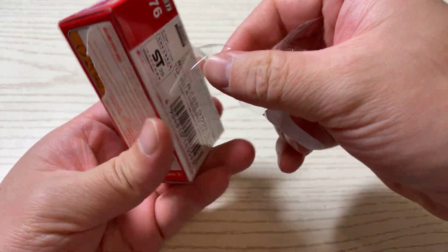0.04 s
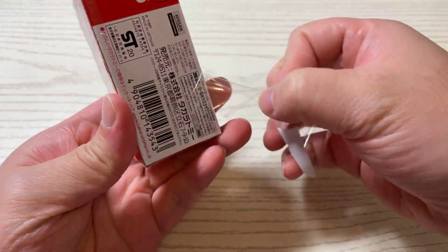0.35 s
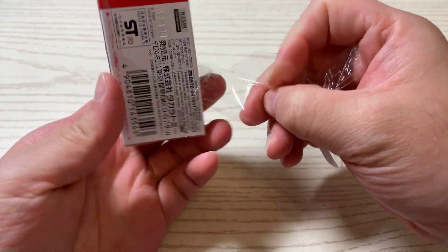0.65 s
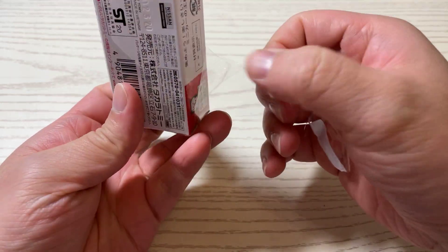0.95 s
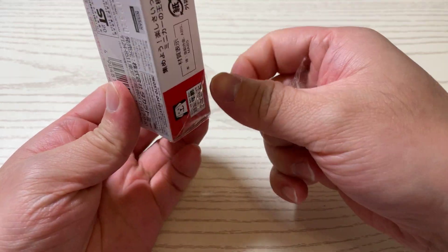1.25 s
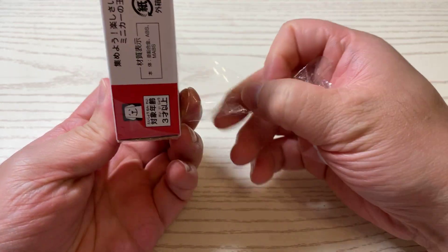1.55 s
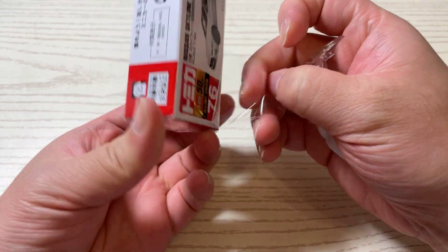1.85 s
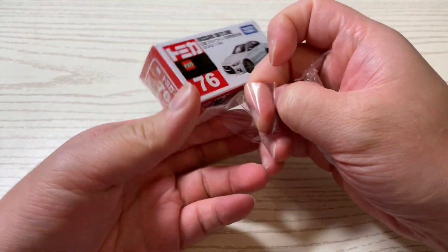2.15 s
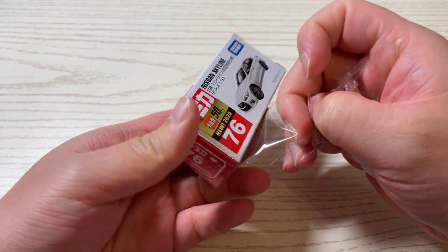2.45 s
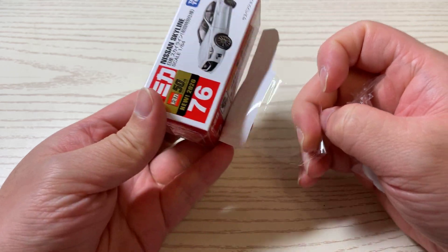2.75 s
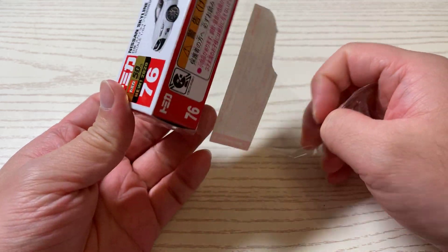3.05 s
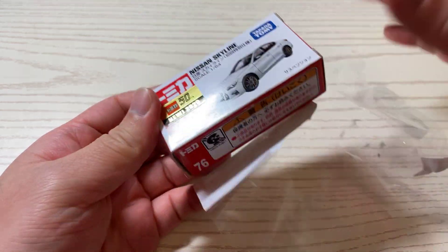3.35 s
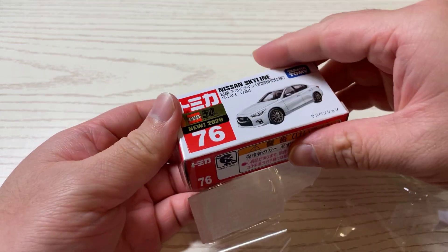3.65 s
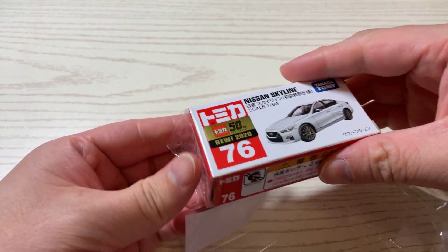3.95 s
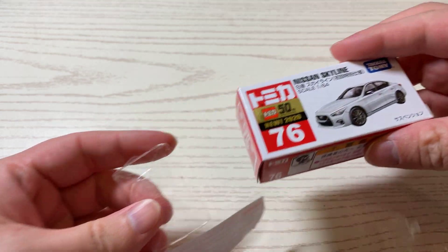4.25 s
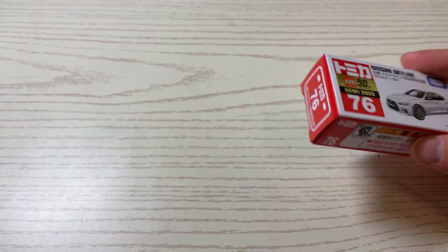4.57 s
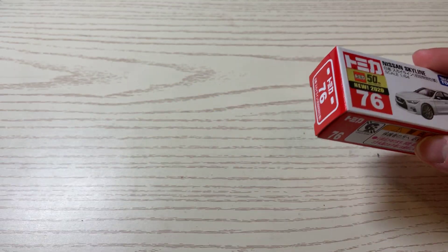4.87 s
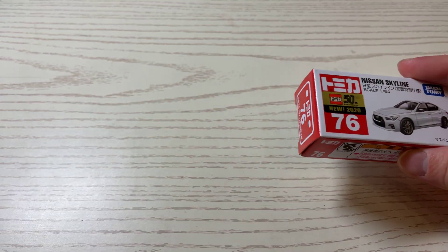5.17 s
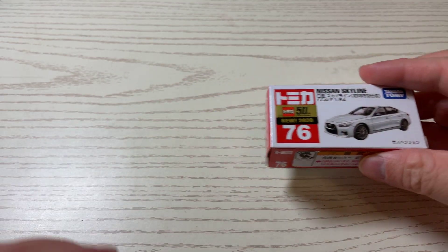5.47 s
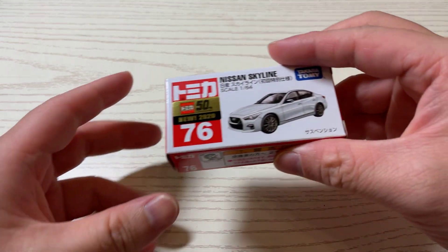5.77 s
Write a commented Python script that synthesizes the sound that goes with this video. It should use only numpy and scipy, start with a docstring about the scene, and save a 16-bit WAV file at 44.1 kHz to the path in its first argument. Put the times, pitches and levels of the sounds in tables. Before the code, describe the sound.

Fingers peel thin plastic wrap off a small cardboard box, with crinkles, sharp snaps, two quick rips and light knocks over a low hum.

```python
"""A small room, close up: fingers pick and peel the thin plastic wrap off a small cardboard box.
The film buckles in sharp snaps over a fine crinkle, rips open in two quick runs of slips and slides
off the card with a soft hiss. The box knocks and rubs in the hand. A pair of microphone ports hears
it all with a quick scatter off table and fingers and a short room tail, while a machine hums low."""
import sys
import numpy as np
from scipy import signal
from scipy.fft import rfft, irfft, next_fast_len
from scipy.io import wavfile
from scipy.ndimage import uniform_filter1d, map_coordinates

SR = 44100
rng = np.random.default_rng(int(sys.argv[2]) if len(sys.argv) > 2 else 0)


def put_to_file(sound):
    """Save the sound as 16-bit audio at rate SR, in the file named by the first command-line argument."""
    columns = np.atleast_2d(sound).T  # one column per channel
    safe = np.clip(columns, -1, 1)
    whole_steps = np.round(safe * 32767)
    wavfile.write(sys.argv[1], SR, whole_steps.astype(np.int16))


N = 260628

# Event levels are fader settings, ahead of each layer's trim and the ports' colour.
# The film's main buckles. Each row: start in seconds, crack in dB, flex in dB, crease pitch in Hz.
BUCKLES = [(0.0277, -29.5, -40, 5000), (0.0757, -25, -25.5, 3900), (0.1059, -28, -39, 3600),
           (0.1284, -25, -44, 6400), (0.1449, -31, -39, 5200), (0.1913, -37.5, -49, 6700),
           (0.2048, -39, -44, 4000), (0.279, -34.5, -35.5, 4400), (0.3706, -31, -28, 4700),
           (0.3738, -32, -27.5, 4840), (0.4083, -40, -40.0, 6600), (0.4293, -31, -35.0, 6800),
           (0.451, -20, -22.5, 4050), (0.4829, -26.5, -25.5, 3620), (0.509, -36.5, -38, 4200),
           (0.5503, -24, -28, 6800), (0.561, -24.5, -40.5, 5600), (0.5795, -34, -35, 3040),
           (0.5952, -26.5, -25, 6850), (0.5989, -20.5, -23.5, 6800), (0.6746, -22.0, -33, 6800),
           (0.6897, -23.5, -28, 2780), (0.7287, -35.0, -40, 3800), (0.7559, -51, -26, 2810),
           (0.772, -26, -33, 6800), (0.7838, -58, -38, 1600), (0.8346, -26, -33, 2800),
           (0.9003, -24.5, -30.5, 6800), (0.9312, -23, -32, 3200), (0.9355, -22, -25, 3130),
           (0.9824, -33, -35.0, 2800), (1.0244, -27.5, -31.5, 2620), (1.0844, -23.5, -35, 6500),
           (1.0977, -29.5, -29.5, 5470), (1.1077, -26, -26.5, 5870), (1.1243, -30, -43, 3000),
           (1.1335, -31, -37, 6700), (1.1703, -46, -27.5, 3030), (1.1972, -22.5, -28.5, 5200),
           (1.2271, -29.0, -27, 2980), (1.2439, -35, -36, 2800), (1.2823, -32, -40.5, 5100),
           (1.3428, -28, -29, 3980), (1.3808, -35, -34, 4600), (1.4463, -45, -29.5, 4530),
           (1.4719, -24, -33, 6600), (1.4814, -26, -30, 3880), (1.5069, -33, -46, 4600),
           (1.5542, -23.5, -27.5, 4600), (1.6129, -29, -31, 2940), (1.6352, -35, -28, 2200),
           (1.7003, -26.5, -27, 3550), (1.7595, -25.5, -35, 6000), (1.8282, -39, -39.5, 5030),
           (1.8611, -32.5, -39.0, 3000), (1.8905, -39, -44, 5000), (1.9799, -38, -56, 3600),
           (2.0076, -36.5, -42, 3000), (2.0385, -35.5, -36, 2800), (2.0506, -21.5, -47, 5950),
           (2.0783, -38, -57.5, 6000), (2.0931, -39.0, -37, 1794), (2.1246, -43, -62.5, 2400),
           (2.1569, -41, -47.5, 3100), (2.1866, -41, -43, 3670), (2.2115, -38.5, -49, 3700),
           (2.3004, -36.5, -47, 1600), (2.37, -40, -43, 5100), (2.3859, -38, -43.5, 5200),
           (2.429, -30.5, -44, 5200), (2.4773, -31.5, -30.5, 3100), (2.5857, -31, -27.5, 2760),
           (2.6201, -36, -55, 5100), (2.6337, -32, -40.5, 6700), (2.6612, -16, -31, 2680),
           (2.6827, -15.5, -21.5, 6000), (2.7137, -17, -26.5, 1600), (2.7362, -16.0, -20, 1700),
           (2.9084, -29, -43, 3600), (2.9564, -35.5, -33, 5140), (2.995, -29.0, -35.5, 5100),
           (3.0185, -19.5, -36, 6470), (3.097, -24.5, -27.5, 6570), (3.1258, -25, -25.0, 1700),
           (3.152, -27.5, -37.0, 6500), (3.2037, -31.5, -33.0, 2790), (3.2378, -44, -58, 1600),
           (3.2505, -47, -43, 1920), (3.4299, -44, -48.5, 3500), (3.4519, -46, -37, 3500),
           (3.7425, -30, -36.5, 3840), (3.7798, -53.5, -44.5, 2400), (3.8978, -44, -42.5, 2520),
           (3.9797, -37, -30.5, 6170), (3.9834, -26, -48, 6730), (3.9951, -31.5, -24, 1870),
           (4.0611, -46, -34, 4400), (4.0659, -33, -29.5, 3180), (4.0811, -57, -36, 2500),
           (4.0915, -42.0, -32.5, 2940), (4.1239, -19, -32, 6900), (4.1273, -20.5, -22.5, 1760),
           (4.2897, -21.5, -30.5, 6800), (4.3183, -36.5, -41, 5400), (4.3367, -41, -43, 2600),
           (4.3617, -25, -38.5, 4900), (4.3829, -19, -35.5, 6800), (4.4184, -27, -42.5, 6800),
           (4.4288, -26.0, -37.5, 6800), (4.4416, -30, -50.0, 6400), (4.4975, -32.5, -43, 6300),
           (4.5052, -25.5, -37.5, 6400), (4.5909, -42.5, -46.5, 2040), (4.7373, -34, -44, 6520),
           (4.7564, -39.0, -44, 6300), (4.7639, -36, -38, 6400), (4.85, -35.5, -36.5, 4860),
           (4.8647, -39.5, -38.5, 5140), (4.8993, -38.5, -36.5, 1630), (5.0434, -39.5, -46, 3480),
           (5.6645, -48.5, -47.5, 2570)]
# Taut film cracks brighter than slack. Each row: time in seconds, treble tilt in dB per octave.
FILM_TENSION = [(0, -12), (1.2, -1.5), (1.8, -4), (3.1, 0.5), (4.1, -7.5), (5.2, -12)]
# The taut film rips open. Each row: start in seconds, length in seconds, slips per second, crack in dB,
# pluck in dB, sizzle in dB, wall pitch in Hz, moment of hardest pull as a share of the length,
# flap in dB, flap sag in Hz per second.
RIPS = [(2.6614, .104, 105, -20.5, -26.5, -33.5, 1563, 0.63, -55.5, 642),
        (2.8401, 0.081, 150, -25.5, -29, -28.5, 1150, 0.26, -38, 1620)]
# How hard the fingers work the film. Each row: time in seconds, level in dB.
FINGER_EFFORT = [(0, -50.5), (.23, -57.5), (.32, -49), (1.25, -52.5), (1.65, -48.5), (1.8, -59.5),
                 (2.05, -53), (2.2, -61.5), (2.54, -60.5), (2.78, -50.5), (3.3, -55.5), (3.39, -82),
                 (3.84, -69), (4.02, -52.5), (4.5, -59.5), (4.72, -76), (5.1, -72.5), (5.9, -89.5)]
# A finger pulls or shifts the film.
# Each row: start in seconds, length in seconds, rustle in dB, fine crinkle in dB.
CRUMPLES = [(.005, 0.014, -49, -31.5), (0.078, 0.026, -49, -37), (0.27, 0.046, -50, -48),
            (0.537, 0.061, -42.5, -44), (0.67, 0.095, -49.5, -46), (0.915, 0.16, -53, -48),
            (1.071, .06, -47.5, -46), (1.189, 0.044, -45, -39), (1.388, 0.089, -45, -46),
            (1.518, 0.11, -42.5, -44), (1.865, 0.029, -51, -47), (2.018, 0.088, -53, -46),
            (3.106, 0.035, -35.5, -33), (3.185, 0.025, -41.5, -41), (3.93, 0.084, -48, -49),
            (3.995, 0.12, -47, -49), (4.288, 0.213, -55.5, -52), (4.566, 0.11, -65, -65),
            (4.754, 0.065, -53, -56.5), (4.845, 0.022, -49, -46), (4.877, 0.25, -55, -62),
            (5.204, 0.022, -58, -56.5), (5.42, 0.033, -67.5, -69), (5.666, 0.052, -67, -66)]
# Tugs and taps on a wall of the box. Each row: time in seconds, level in dB, centre pitch in Hz.
BOX_KNOCKS = [(.0135, -34.5, 1150), (.0775, -40, 990), (.3238, -34, 375), (.4303, -27.5, 750),
              (.452, -28.5, 1230), (.6007, -31.5, 1180), (.604, -35.5, 290), (.6316, -30, 1100),
              (.6506, -33, 970), (.6918, -21.5, 1820), (.7565, -43, 1300), (.785, -34, 1400),
              (.9014, -31.5, 1190), (1.4472, -31, 1010), (1.5423, -24.5, 902), (1.618, -34, 1590),
              (1.637, -29, 1260), (1.7035, -30, 1000), (1.7183, -28.5, 763), (2.052, -27.5, 1260),
              (2.2635, -47, 1250), (2.4784, -33, 1300), (2.5867, -28, 1345), (2.6955, -24.5, 1600),
              (2.7065, -25, 1450), (2.7155, -20.5, 1400), (2.7372, -23.5, 1100), (2.7412, -24.5, 1000),
              (3.022, -32.5, 803), (3.1274, -24, 1385), (3.2069, -29, 910), (3.6322, -38, 980),
              (3.997, -23, 700), (4.0005, -28, 270), (4.0715, -43, 420), (4.0925, -28, 1700),
              (4.1336, -30, 605), (4.291, -37, 607), (4.9003, -35.5, 797), (5.0277, -36.5, 920)]
# Skin drags over card. Each row: start in seconds, length in seconds, level in dB, hollow pitch in Hz.
SKIN_RUBS = [(0.261, 0.033, -48, 1204), (0.294, 0.059, -46.5, 470), (0.407, 0.048, -53.5, 648),
             (0.589, 0.074, -54, 1350), (0.738, .05, -49.5, 1195), (0.958, 0.092, -53.5, 1400),
             (1.085, 0.029, -49.5, 1006), (1.462, 0.025, -42, 1050), (1.495, 0.04, -48.5, 481.6),
             (1.567, 0.061, -44.5, 1311), (1.715, 0.017, -43, 827), (2.04, 0.042, -49, 1395),
             (2.238, 0.048, -48, 1450), (3.11, 0.038, -42.5, 270), (3.986, 0.018, -44, 455),
             (4.066, 0.012, -40.5, 906), (4.133, 0.01, -43, 248), (4.75, 0.018, -49.5, 1250)]
# Smooth film slides off the card. Each row: start in seconds, length in seconds, level in dB.
FILM_SLIDES = [(1.863, 0.32, -63), (3.427, .1, -54), (3.527, 0.16, -59), (3.69, 0.078, -54.5),
               (3.902, 0.068, -58), (4.902, .2, -65)]

# EQ curves. Each row: frequency in Hz, relative level in dB.
CRACK_EQ = [(3000, -48.5), (6000, -7), (8000, -3), (10500, 2), (12200, -0.5), (14000, 1.5), (15500, -6),
            (16500, -42.5)]  # the bright edge of a buckle
FLEX_EQ = [(400, -22.5), (1000, -5), (1500, -4.5), (2300, 1.5), (3000, 1.5), (5000, -0.5), (6500, 0.5),
           (9000, -14.5)]  # the body of the bending sheet
PANEL_EQ = [(750, -32.5), (1050, 5), (1450, 2), (2100, 8), (2800, -4.5), (5000, 2.5), (7000, -15.5),
            (9000, -24)]  # a taut panel of film, plucked
CARD_EQ = [(90, -43), (180, 1), (280, 2), (500, -3.5), (700, -1), (960, 3.5), (1300, -1.5), (2200, -9),
           (5000, -29.5)]  # dull cardboard
SLIDE_EQ = [(700, -8), (2000, -5), (3600, 0.5), (5000, -3), (7500, 2), (14000, -8.5), (16500, -25)]  # the hiss of gliding film
PORT_EQ = [(450, 1.5), (650, -1.5), (950, 0), (5200, 1), (5600, -3.5), (6400, -0.5), (8200, 0), (9800, 0),
           (12700, -0.45), (14000, 1)]  # the colour of the microphone ports
ROOM_TONE_EQ = [(18, -27.5), (28, -18.5), (42, -5), (60, -4), (78, -6.5), (100, -5.5), (125, -4),
                (165, -20.5), (300, -22), (600, -30.5), (1500, -37.5), (4000, -57), (9000, -70.5),
                (15000, -52.5)]  # rumble and faint hiss

# Stereo width. Each row: frequency in Hz, left-right likeness from 0 to 1.
FACET_LIKENESS = [(200, .85), (1000, .75), (2500, .58), (5000, .55), (8000, .8), (14000, .92)]  # the crumpled sheet radiates from many facets
DIFFUSE_LIKENESS = [(100, .97), (300, .75), (1000, .4), (4000, .2), (8000, .5), (14000, .75)]  # sound from all around
# The hands reach the ports at different moments. Each row: frequency in Hz, left lead in radians.
PORT_LEAD = [(200, 0), (1300, .6), (2800, 1.5), (4000, .6), (5200, .5), (5800, -1.2), (7000, -1.8),
             (7700, -2.8), (9500, -3.6), (12500, -5.8), (14000, -6.1)]
# They also arrive at different levels. Each row: frequency in Hz, left minus right in dB.
PORT_BALANCE = [(120, -12), (450, 6.5), (2000, 2), (3200, 5), (5300, 4), (5700, -5.5), (6900, 6.5),
                (9000, -1)]
# Base decay of the reflections, scaled for each tail. Each row: frequency in Hz, T60 in seconds.
BASE_DECAY = [(200, 0.08), (1500, 0.31), (6000, 0.16), (15000, 0.09)]
# The machine's hum. Each row: centre in Hz, width in Hz, rms level in dB.
HUM_BANDS = [(57.8, 10.9, -50), (118.3, 8.7, -61), (144.5, 2.2, -58), (289.2, 15, -72)]

ATTACK_S, FILM_RELEASE_T60_S, RUB_RELEASE_T60_S = 0.0072, 0.12, .05  # envelopes of finger movements
RIP_RELEASE_T60_S = 0.088


def film_snaps(crack_trim_db=-1, flex_trim_db=-2):
    """Each buckle is a bright crack and a slower flex of the sheet, ringing at its crease's pitch."""
    start, crack_db, flex_db, crease_hz = np.vstack([in_steps(np.array(BUCKLES)), chance_buckles()]).T
    tilt_db = np.interp(start, *np.transpose(FILM_TENSION))[:, None]
    crack = bursts(start, crack_db + crack_trim_db, CRACK_EQ, rise=0.0002, t60=0.0051,
                   ring_db=-24, ring_t60=0.059, ripple_db=3.5, tilt_db=tilt_db)
    flex = bursts(start, flex_db + flex_trim_db, FLEX_EQ, rise=0.00037, t60=0.006,
                  ring_db=-20.5, ring_t60=0.066, ripple_db=3, crease_hz=crease_hz)
    return crack + flex


def in_steps(buckles, lead_in_s=.0013, lead_in_db=-19.5, settle_s=.0031, settle_db=-11.5):
    """A buckle gives way in steps: a weak slip leads into it and another settles it."""
    early, late = (.5 + rng.random((len(buckles), 2))).T
    step = lambda delay, db: buckles + np.outer(delay, [1, 0, 0, 0]) + [0, db, db, 0]
    return np.vstack([buckles, step(-lead_in_s * early, lead_in_db), step(settle_s * late, settle_db)])


def chance_buckles(count=160, per_s=18, crack_db=12, flex_db=9, scatter_db=3, pitch_hz=3400):
    """Small random ticks whose level rides on the fingers' effort, in rows like BUCKLES."""
    chance = rng.random((count, 4))
    start = np.cumsum(-np.log(1 - chance[:, 0])) / per_s
    effort_db = np.interp(start, *np.transpose(FINGER_EFFORT))[:, None]
    db = effort_db + scatter_db * np.sqrt(3) * (2 * chance[:, 1:3] - 1)
    crease_hz = pitch_hz * 2 ** (2 * chance[:, 3] - 1)
    return np.column_stack([start, db + [crack_db, flex_db], crease_hz])[start < N / SR]


def tear(wall_db=-2.5):
    """Each slip of a rip cracks, plucks the taut panel and tugs the box, over flap and sizzle."""
    start, crack_db, pluck_db, wall_hz = rip_slips().T
    crack = bursts(start, crack_db, CRACK_EQ, rise=.00025, t60=.0045,
                   ring_db=-18, ring_t60=.035, ripple_db=3)
    pluck = bursts(start, pluck_db, PANEL_EQ, rise=0.00024, t60=0.0064,
                   ring_db=-11.5, ring_t60=0.062, ripple_db=0.0)
    tugs = box_knocks(np.column_stack([start, pluck_db + wall_db, wall_hz]), ring_db=-2, ring_t60=0.025)
    return crack + pluck + tugs + flap() + sizzle()


def rip_slips(count=24, jitter=.2, scatter_db=1, swell_db=26, wall_sag_hz_per_s=4000):
    """A rip advances in nearly even jumps; the plucks swell toward the hardest pull, then ease off."""
    rows = []
    for start, length, rate, crack_db, pluck_db, _, wall_hz, hardest, *_ in RIPS:
        late, size = rng.standard_normal((count, 2)).T
        step = np.arange(count)
        age = (step + jitter * late * (step > 0)) / rate
        size_db = scatter_db * np.clip(size, -1, 1)
        pull_db = -swell_db * (age / length - hardest) ** 2
        pitch_hz = wall_hz - wall_sag_hz_per_s * age  # the loosening wall sounds lower
        slips = np.column_stack([start + age, crack_db + size_db, pluck_db + size_db + pull_db, pitch_hz])
        rows.append(slips[age < length])
    return np.vstack(rows)


def sizzle(rustle_db=-7.5, rub_db=-8.5):
    """Between its slips a rip parts the film in a dense stream that shakes sheet and card."""
    start, length, _, _, _, sizzle_db, *_ = np.transpose(RIPS)
    parting = grains(CRACK_EQ, per_s=3000, scatter_db=3.0, clump_db=6.0)
    sheet = amp(rustle_db) * grains(FLEX_EQ, per_s=2000, scatter_db=3.0, clump_db=3.5)
    card = amp(rub_db) * grains(CARD_EQ, per_s=4500, scatter_db=3.5, clump_db=3.0)
    gain = strokes(start, length, sizzle_db, attack=0.0019, release_t60=RIP_RELEASE_T60_S)
    return gain * (parting + sheet + card)


def flap(start_hz=352.5, hold_share=.75):
    """The freed flap drums, ever lower as the rip lengthens it."""
    age, _, rip_length, *_, sag = latest(RIPS)
    start, length, *_, db, _ = np.transpose(RIPS)
    gain = strokes(start, hold_share * length, db, attack=0.037, release_t60=RIP_RELEASE_T60_S)
    return gain * rough_tone(start_hz - sag * np.minimum(age, rip_length), width_hz=60)


def handling(steady_crinkle_db=1.5, steady_rub_db=-6, still_hand_db=-66):
    """Fingers crinkle film and drag over card: a bed that follows their effort, plus each movement."""
    effort_db = np.interp(np.arange(N) / SR, *np.transpose(FINGER_EFFORT))
    start, length, rustle_db, crinkle_db = np.transpose(CRUMPLES)
    crinkle = power_sum(amp(effort_db + steady_crinkle_db), strokes(start, length, crinkle_db))
    rustle = power_sum(amp(effort_db), strokes(start, length, rustle_db))
    rub = power_sum(amp(still_hand_db), amp(effort_db + steady_rub_db), rub_envelope())
    return (crinkle * amp(-2.0) * grains(CRACK_EQ, per_s=4800, scatter_db=5.5, clump_db=6.0)
            + rustle * amp(-2.5) * grains(FLEX_EQ, per_s=2500, scatter_db=5.5, clump_db=3.5)
            + rub * amp(-1.5) * grains(CARD_EQ, per_s=1500, scatter_db=3.5, clump_db=6.0))


def box_knocks(knocks, ring_db=-9, ring_t60=0.019, wave_db=-1, thud_db=-18, octaves=0.46, size=2048):
    """A tap sends a bending wave through the card, highs first; the wall rings over a dull thud."""
    start, db, pitch_hz = np.transpose(knocks)
    centre = pitch_hz[:, None]
    t, hz = np.arange(size) / SR, np.fft.rfftfreq(size, 1 / SR) + 1
    lead_s, travel_s = .004, 0.002667  # pre-roll for the early highs; travel time at 1 kHz
    delay = lead_s + travel_s * (np.sqrt(1000 / hz) - np.sqrt(1000 / centre))
    phase = 2 * np.pi * np.cumsum(delay, axis=1) * SR / size
    stiffness = np.clip(centre / 1300, .55, 1.1)  # slack walls give a broad tap, taut ones ring
    wave = irfft(np.exp(-.5 * (np.log2(hz / centre) * stiffness / octaves) ** 2 - 1j * phase))
    wave = wave / np.abs(wave).max(axis=1, keepdims=True)
    ring = stiffness ** 2 * np.sin(2 * np.pi * centre * t) * fade(t, ring_t60)
    thud = bursts(start, db + thud_db, CARD_EQ, rise=.0005, t60=.02,
                  ring_db=-14, ring_t60=.035, ripple_db=3)
    return (placed(start - lead_s, amp(db + wave_db)[:, None] * wave)
            + placed(start, amp(db + ring_db)[:, None] * ring) + thud)


def hollow_card(trim_db=-6.5, sag_octaves_per_s=8):
    """The card under a sliding finger rings with a sinking, hollow tone."""
    age, _, length, _, pitch_hz = latest(SKIN_RUBS)
    sunk_octaves = sag_octaves_per_s * np.minimum(age, length)
    return amp(trim_db) * rub_envelope() * rough_tone(pitch_hz * 2 ** -sunk_octaves, width_hz=240)


def rub_envelope():
    """The card sounds while skin drags over it and stops soon after it lets go."""
    start, length, db, _ = np.transpose(SKIN_RUBS)
    return strokes(start, length, db, release_t60=RUB_RELEASE_T60_S)


def sliding_wrap():
    """The loosened wrap glides over the box with a soft hiss, without buckling."""
    hiss = grains(SLIDE_EQ, per_s=6600, scatter_db=3.0, clump_db=3.5)
    return strokes(*np.transpose(FILM_SLIDES)) * hiss


def bursts(times, db, eq, rise, t60, ring_db, ring_t60, ripple_db, tilt_db=0, crease_hz=None, size=2048):
    """Short stereo noise hits with a weaker ring; a random ripple gives each its own resonances."""
    t, hz = np.arange(size) / SR, np.fft.rfftfreq(size, 1 / SR)
    chance = rng.standard_normal((len(times), 3, size)).swapaxes(0, 1)
    treble_octaves = np.log2(np.maximum(hz, 7000) / 7000)
    ripple = unit(uniform_filter1d(chance[2, :, :len(hz)], size=24, axis=1))
    colour_db = along(eq, hz) + ripple_db * ripple + tilt_db * treble_octaves
    if crease_hz is not None:
        boost_db, width_octaves = 8, .14  # a narrow bell at the crease's pitch
        octaves_off = np.log2((hz + 1) / crease_hz[:, None])
        colour_db = colour_db + boost_db * np.exp(-.5 * (octaves_off / width_octaves) ** 2)
    noise = irfft(rfft(chance[:2]) * amp(colour_db))
    attack = 1 - np.exp(-(t / rise) ** 2)
    decay = fade(t, t60) + amp(ring_db) * fade(t, ring_t60)
    hits = noise * attack * decay
    onset_rms = np.sqrt(np.mean(hits[..., t < .002] ** 2, axis=-1))  # the first 2 ms set the level
    hits = hits * (amp(db) / onset_rms)[..., None]
    return spread(np.array([placed(times, half) for half in hits]), FACET_LIKENESS)


def grains(eq, per_s, scatter_db, clump_db):
    """A texture of countless tiny slips, unequal in size, that come in clumps."""
    slips = (rng.random(N) < per_s / SR) * rng.choice([-1, 1], (2, N))
    size_db = scatter_db * np.clip(rng.standard_normal(N), -2, 2)
    swell_db = clump_db * np.clip(wobble(130), -2, 2)
    return coloured(spread(slips * amp(size_db + swell_db), FACET_LIKENESS), eq)


def rough_tone(hz, width_hz):
    """A resonance shaken at random, following a pitch curve, at rms 1."""
    phase = 2 * np.pi * np.cumsum(hz) / SR
    return unit(np.sin(phase + wobble(width_hz)) * amp(3.8 * wobble(width_hz)))


def strokes(starts, lengths, db, attack=ATTACK_S, release_t60=FILM_RELEASE_T60_S):
    """The joint envelope of movements that each rise, hold and die away."""
    t = np.arange(N) / SR
    power = np.zeros(N)
    for start, hold, level in zip(starts, lengths, db):
        near = slice(max(int(start * SR), 0), int((start + hold + release_t60) * SR))
        age = t[near] - start
        release = fade(np.maximum(age - hold, 0), release_t60)
        power[near] += (amp(level) * np.clip(age / attack, 0, 1) * release) ** 2
    return np.sqrt(power)


def latest(rows):
    """For every sample: the age of the latest event, then each of its columns."""
    table, t = np.array(rows), np.arange(N) / SR
    now = table[np.maximum(np.searchsorted(table[:, 0], t) - 1, 0)]
    return np.maximum(t - now[:, 0], 0), *now.T


def placed(times, sounds):
    """Lay one row of sound per event on the timeline."""
    index = np.round(times * SR).astype(int)[:, None] + np.arange(sounds.shape[1])
    return np.bincount(np.maximum(index, 0).ravel(), sounds.ravel(), N)[:N]


def power_sum(*gains):
    """Unrelated movements add in power."""
    return np.sqrt(sum(gain ** 2 for gain in gains))


def amp(db):
    """Decibels to gain."""
    return 10 ** (np.asarray(db) / 20)


def unit(x):
    """Scale to rms 1."""
    return x / np.sqrt(np.mean(x ** 2) + 1e-20)


def along(points, hz):
    """Read a curve of (Hz, value) points on a log frequency axis."""
    point_hz, values = np.transpose(points)
    return np.interp(np.log(hz + 1), np.log(point_hz + 1), values)


def fade(t, t60):
    """Exponential decay, 60 dB down after t60 seconds."""
    return np.exp(-np.log(1000) * t / t60)


def wobble(rate):
    """A smooth random curve, rate knots a second."""
    knots = rng.standard_normal(4096)
    return map_coordinates(knots, [np.arange(N) * rate / SR], mode="wrap")


def filtered(x, response):
    """Run x through a complex frequency response."""
    size = next_fast_len(N + SR // 2)
    return irfft(rfft(x, size) * response(np.fft.rfftfreq(size, 1 / SR)), size)[..., :N]


def coloured(x, eq):
    """x through an EQ curve, at rms 1."""
    return unit(filtered(x, lambda hz: amp(along(eq, hz))))


def spread(pair, likeness):
    """Mix two unrelated signals as mid and side into left and right of a given likeness."""
    size = pair.shape[-1]
    fast = next_fast_len(size, True)
    turn = np.arccos(np.clip(along(likeness, np.fft.rfftfreq(fast, 1 / SR)), -1, 1)) / 2
    mid, side = rfft(pair[0], fast) * np.cos(turn), rfft(pair[1], fast) * np.sin(turn)
    return irfft(np.array([mid + side, mid - side]), fast)[..., :size]


def diffuse(size):
    """Stereo noise that arrives from all around."""
    return spread(rng.standard_normal((2, size)), DIFFUSE_LIKENESS)


def ports(pair):
    """The two ports colour the hands' sound and hear it with a different phase and level."""
    left = lambda hz: np.exp(.5j * along(PORT_LEAD, hz)) * amp(along(PORT_BALANCE, hz) / 2)
    return filtered(pair, lambda hz: amp(along(PORT_EQ, hz)) * np.array([left(hz), 1 / left(hz)]))


def reflections(x, t60_scale, build_s, size=SR // 2):
    """A diffuse stereo tail in which each frequency dies at its own speed."""
    hz, t, bands = signal.stft(diffuse(size), SR, nperseg=256)
    decay = fade(t, t60_scale * along(BASE_DECAY, hz)[:, None])
    tail = signal.istft(bands * decay, SR, nperseg=256)[1]
    tail = tail * (1 - np.exp(-(np.arange(tail.shape[1]) / SR / build_s) ** 2))
    return signal.fftconvolve(x.mean(axis=0)[None], tail / np.linalg.norm(tail[0]), axes=1)[:, :N]


def machine_hum():
    """A machine's low, wavering hum, made of narrow bands of noise."""
    hum = np.zeros(N)
    for centre_hz, width_hz, db in HUM_BANDS:
        band = lambda hz: 1 / (1 + (2 * (hz - centre_hz) / width_hz) ** 4)
        hum += amp(db) * unit(filtered(rng.standard_normal(N), band))
    return hum


def room_tone(db=-49):
    """The room's faint rumble and hiss, from all around."""
    return amp(db) * coloured(diffuse(N), ROOM_TONE_EQ)


def scene():
    """The mix: wrap and box up front, their scatter off table and fingers, the room and the hum."""
    direct = film_snaps() + tear() + handling() + sliding_wrap() + hollow_card() + box_knocks(BOX_KNOCKS)
    scatter = amp(-16) * reflections(direct, t60_scale=0.16, build_s=0.0044)
    room = amp(-17) * reflections(direct, t60_scale=0.63, build_s=0.0047)
    return ports(direct + scatter + room) + machine_hum() + room_tone()


def record(dry, top_hz=16900, slope_width_hz=900):
    """A steep high cut takes off the very top."""
    return filtered(dry, lambda hz: np.clip((top_hz - hz) / slope_width_hz, 0, 1))


dry = scene()
out = record(dry)
put_to_file(out)
```